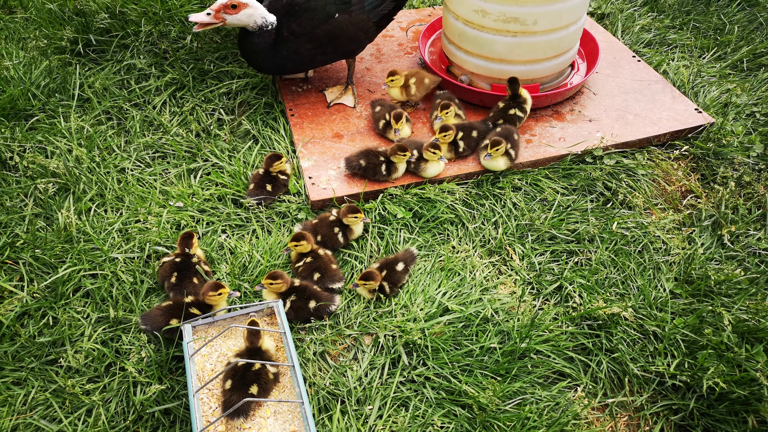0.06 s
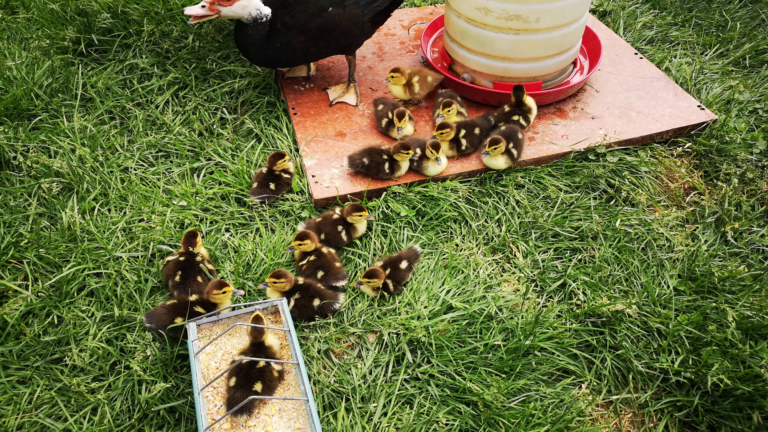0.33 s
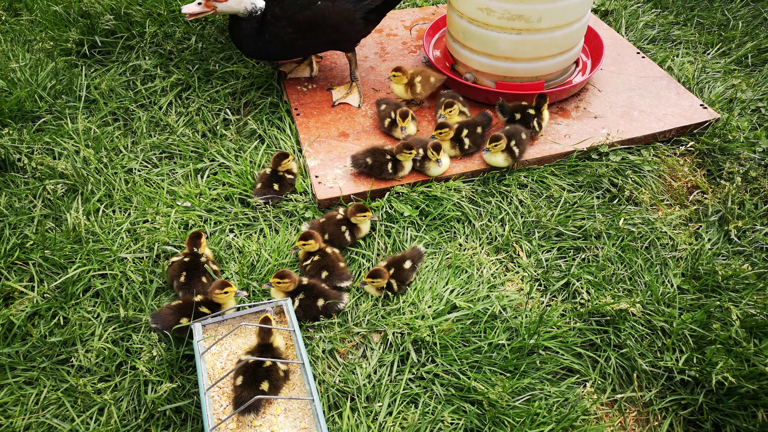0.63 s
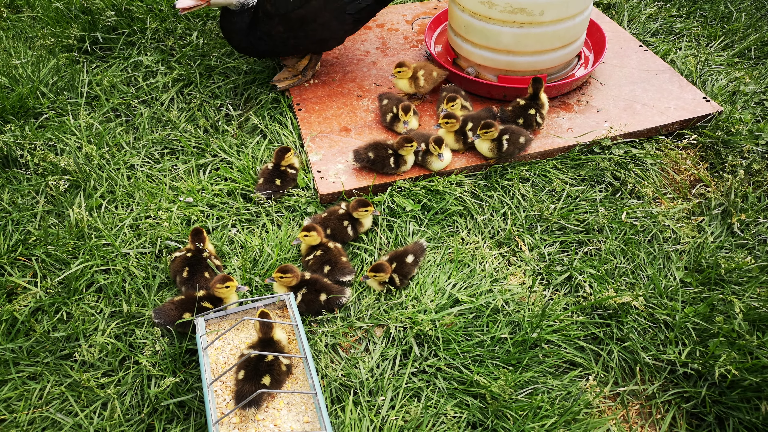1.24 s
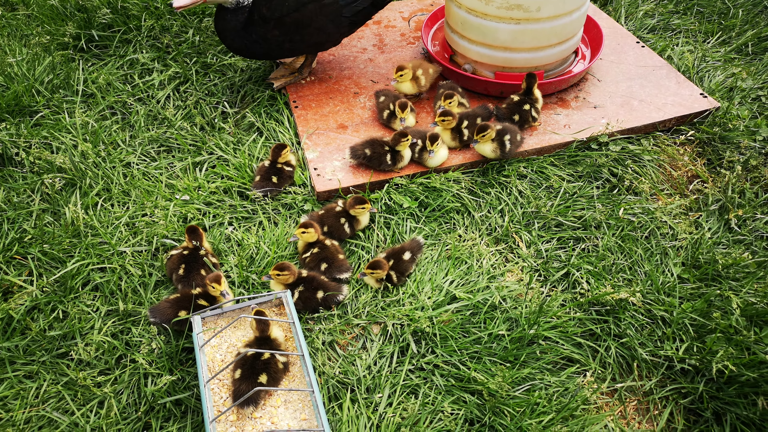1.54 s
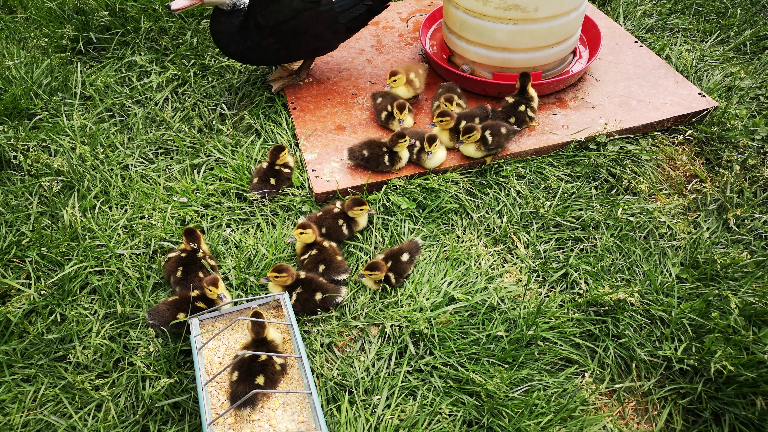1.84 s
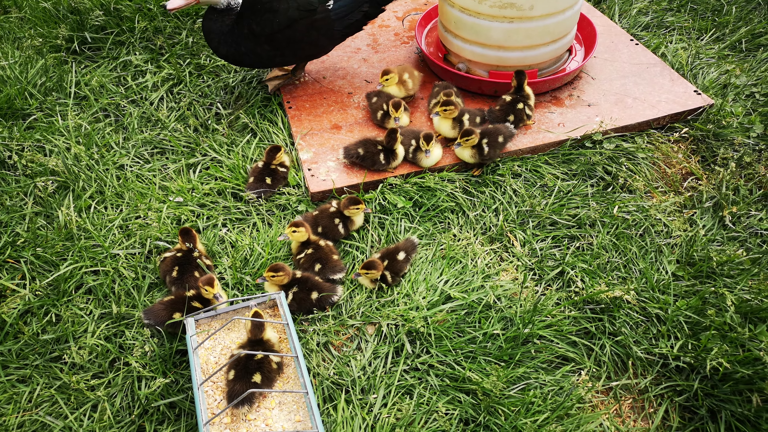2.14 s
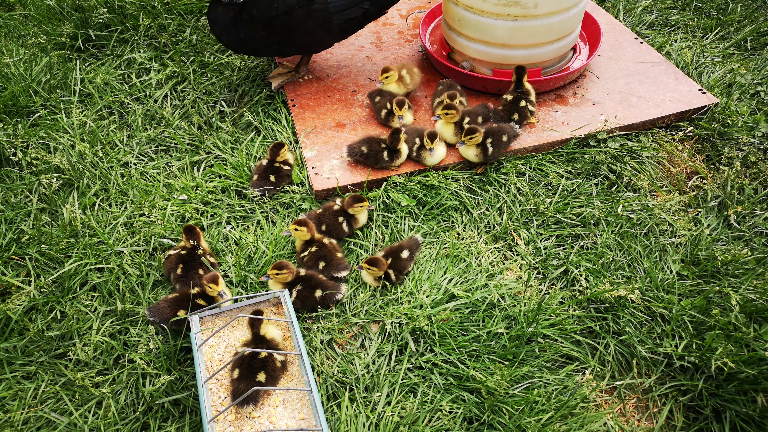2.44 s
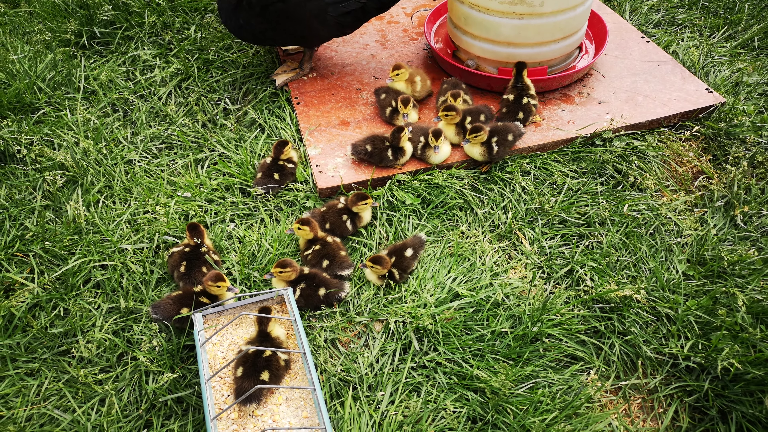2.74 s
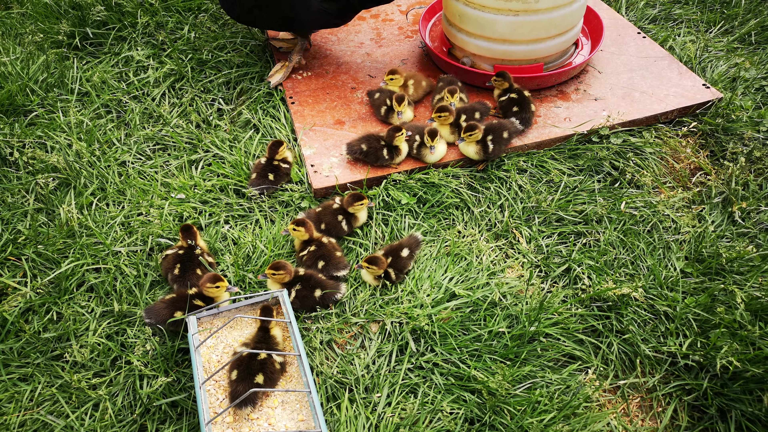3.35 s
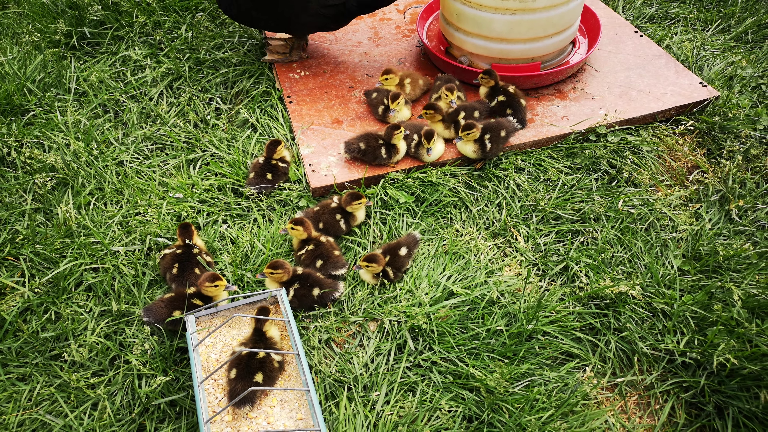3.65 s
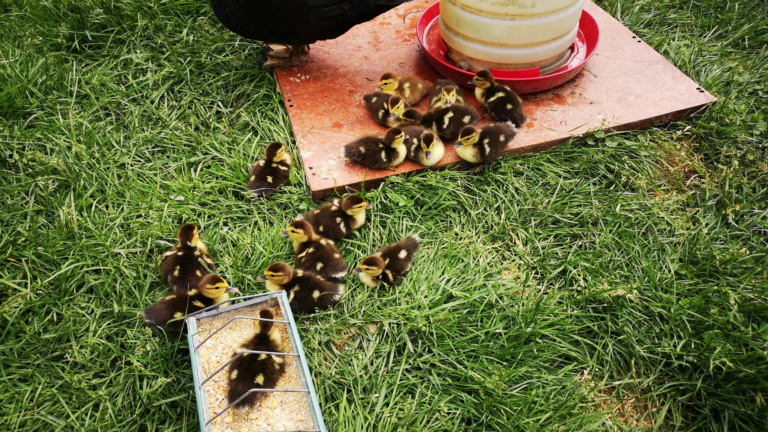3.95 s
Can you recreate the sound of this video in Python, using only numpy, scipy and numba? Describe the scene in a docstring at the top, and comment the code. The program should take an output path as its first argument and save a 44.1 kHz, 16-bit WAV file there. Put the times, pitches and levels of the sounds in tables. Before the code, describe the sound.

A hen's drawn-out whine and raspy cackle follow light beak taps, faint duckling peeps and a few soft clucks in a quiet yard. Small birds call far off, and the rumbling microphone is bumped near the end.

```python
"""Hen and ducklings in a yard

Ducklings peep, tap and knock at a hollow feeder and rustle the grass; a hen clucks softly.
Another hen, on the right, swells into a long whine that drops in pitch and breaks into a hoarse
cackle: syrinx pulses and rasp ringing her throat. Small birds call further off, over a soft hiss
and a distant drone. Air rumbles on the microphone, which takes one dull bump."""
import sys
import numpy as np
from scipy import signal
from scipy.fft import rfft, irfft, next_fast_len
from scipy.io import wavfile
from scipy.ndimage import uniform_filter1d, map_coordinates
from numba import njit

SR = 44100
rng = np.random.default_rng(int(sys.argv[2]) if len(sys.argv) > 2 else 0)


def master_out(mix):
    """Clip the mix to full scale and print it as 16-bit PCM to the path in sys.argv[1]."""
    frames = np.transpose(np.atleast_2d(mix))
    ceiling = np.clip(frames, -1, 1)
    pcm = np.round(ceiling * 32767).astype(np.int16)
    wavfile.write(sys.argv[1], SR, pcm)


N = 176400


def amp(db):
    """Decibels to gain."""
    return 10 ** (np.asarray(db) / 20)


def unit(x):
    """Scale to rms 1."""
    return x / np.sqrt(np.mean(x ** 2) + 1e-20)


def clock():
    """Time of every sample in seconds."""
    return np.arange(N) / SR


def along(points, hz):
    """Interpolate (Hz, value) points on a log frequency axis."""
    freqs, values = np.transpose(points)
    return np.interp(np.log(hz + 1), np.log(freqs + 1), values)


def curve(points):
    """Interpolate (seconds, value) points at every sample."""
    times, values = np.transpose(points)
    return np.interp(clock(), times, values)


def gate(start, end, fade_s=0.0034):
    """1 between two times, with soft edges."""
    return np.clip(np.minimum(clock() - start, end - clock()) / fade_s + .5, 0, 1)


def loudness(points):
    """Gain from (seconds, dB) points, silent outside their span."""
    return amp(curve(points)) * gate(points[0][0], points[-1][0])


def swells(rows):
    """Sum of bell-shaped rises and falls of gain."""
    return sum(amp(db) * np.exp(-((clock() - centre) / half) ** 2) for centre, half, db in rows)


def wobble(rate):
    """Smooth random curve, rate knots a second."""
    return map_coordinates(rng.standard_normal(8192), [clock() * rate], mode="wrap")


def tone(hz):
    """Sine of rms 1 following a pitch curve."""
    return np.sqrt(2) * np.sin(2 * np.pi * np.cumsum(hz) / SR)


def filtered(x, response):
    """Apply a frequency response, given as a function of Hz."""
    size = next_fast_len(N + SR // 4)
    return irfft(rfft(x, size) * response(np.fft.rfftfreq(size, 1 / SR)), size)[..., :N]


def pan(x, db):
    """Place a sound by its left-minus-right level."""
    ratio = amp(db)
    return np.array([2 * ratio / (1 + ratio) * x, 2 / (1 + ratio) * x])


def steady(x):
    """Even out the level, leaving the fast grain."""
    return x / np.sqrt(np.abs(uniform_filter1d(x * x, size=1100)) + 1e-14)


@njit
def three_poles(x, hz, width_hz):
    """Three complex one-pole stages in series, tuned per sample."""
    y = np.zeros(len(x))
    a, b, c = 0j, 0j, 0j
    radius = np.exp(-np.pi * width_hz / SR)
    for i in range(len(x)):
        angle = 2 * np.pi * hz[i] / SR
        pole = radius * complex(np.cos(angle), np.sin(angle))
        a = a * pole + (1 - radius) * x[i] + 1e-20
        b = b * pole + (1 - radius) * a
        c = c * pole + (1 - radius) * b
        y[i] = c.real
    return y


def resonate(x, hz, width_hz):
    """Steep resonance with a constant or moving centre."""
    return three_poles(x, hz * np.ones(len(x)), float(width_hz))


def yard_echo(x, t60_s=0.17):
    """Short scattered echoes from fences and sheds."""
    t = np.arange(SR // 2) / SR
    onset = 1 - np.exp(-t / 0.00083)
    tail = rng.standard_normal((2, len(t))) * amp(-60 * t / t60_s) * onset
    return signal.fftconvolve(x, tail / np.linalg.norm(tail[0]), axes=1)[:, :N]


# Hiss spectrum. Each row: frequency in Hz, relative level in dB.
HISS_SPECTRUM = [(150, -34), (250, 0.5), (405, -6.5), (534, -16), (1380, -1.5), (2360, 0), (3630, -9.5),
                 (5040, -17), (7640, -17.5), (15500, -33)]
# Hiss level. Each row: time in seconds, level in dB.
HISS_LEVEL = [(0, -64), (2.3, -63), (3.6, -58)]
# Hiss direction. Each row: frequency in Hz, left minus right in dB.
HISS_BALANCE = [(900, 1.5), (2380, -11), (6000, -1.5)]
# Hiss width. Each row: frequency in Hz, left-right correlation.
HISS_CORRELATION = [(2200, 0.12), (8000, 0.023)]


def yard_hiss():
    """Soft, wide hiss, mostly from the right."""
    def mid_side_gains(hz):
        angle = np.arccos(along(HISS_CORRELATION, hz)) / 2
        return amp(along(HISS_SPECTRUM, hz)) * [np.cos(angle), np.sin(angle)]

    mid, side = filtered(rng.standard_normal((2, N)), mid_side_gains)
    stereo = np.array([mid + side, mid - side])
    hiss = unit(filtered(stereo, lambda hz: pan(1, along(HISS_BALANCE, hz))))
    return hiss * amp(curve(HISS_LEVEL) + 0.38 * wobble(7.35))


# Drone partials. Each row: frequency in Hz, level in dB.
DRONE_PARTIALS = [(86, -61), (172, -65)]


def drone():
    """Distant drone, wavering in level and pitch."""
    return sum(amp(db + 2.52 * wobble(5.8)) * tone(hz * (1 + 0.01503 * wobble(12)))
               for hz, db in DRONE_PARTIALS)


# Rumble spectrum. Each row: frequency in Hz, relative level in dB.
RUMBLE_SPECTRUM = [(25, -1.5), (50, 4.5), (85, -3.5), (120, -6.5), (175, -10), (240, -17), (350, -40.5),
                   (1500, -110)]
# Rumble level. Each row: time in seconds, level in dB.
RUMBLE_LEVEL = [(0, -53), (2.6, -56), (3.55, -45.5), (4, -49)]
# Puffs of air. Each row: centre in seconds, half length in seconds, level in dB.
GUSTS = [(.04, 0.0079, -38.5), (.35, 0.051, -52.5), (.64, 0.075, -51), (1.5, 0.012, -42.5),
         (3.07, 0.077, -51), (3.85, 0.082, -35)]
GUST_CUTOFF_HZ = 91


def microphone_rumble():
    """Air buffets the microphone, with deeper puffs; the same on both sides."""
    rumble = unit(filtered(rng.standard_normal(N), lambda hz: amp(along(RUMBLE_SPECTRUM, hz))))
    deep = unit(filtered(rumble, lambda hz: 1 / np.hypot(1, hz / GUST_CUTOFF_HZ)))
    return rumble * amp(curve(RUMBLE_LEVEL)) + deep * swells(GUSTS)


def microphone_bump(centre_s=3.8795, hz=97.1, peak_db=-14.5):
    """One dull bump on the microphone: a single low pulse."""
    phase_squared = (np.pi * hz * (clock() - centre_s)) ** 2
    return amp(peak_db) * (1 - 2 * phase_squared) * np.exp(-phase_squared)


# Whistle envelope. Each row: time in seconds, level in dB.
WHISTLE_LEVEL = [(0.9, -67), (0.946, -53), (1.09, -58), (1.12, -69), (1.135, -58), (1.22, -59),
                 (1.258, -71), (1.296, -64), (1.36, -68)]
WHISTLE_HZ, WHISTLE_SAG_HZ_PER_S, WHISTLE_PAN_DB = 2845, 120, 9


def bird_whistle():
    """One long, faltering whistle that sinks slightly."""
    sinking_hz = WHISTLE_HZ - WHISTLE_SAG_HZ_PER_S * (clock() - WHISTLE_LEVEL[0][0])
    pitch = sinking_hz * (1 + 0.0028 * wobble(38.1))
    return pan(loudness(WHISTLE_LEVEL) * tone(pitch), WHISTLE_PAN_DB)


# Trill envelope. Each row: time in seconds, level in dB.
TRILL_LEVEL = [(1.52, -81), (1.588, -65.5), (2.15, -86)]
TRILL_HZ, TRILL_SPREAD_HZ = 4270, 144


def bird_trill():
    """A far bird's call, buzzy from fast pitch jitter."""
    return loudness(TRILL_LEVEL) * tone(TRILL_HZ + TRILL_SPREAD_HZ * wobble(700))


# Peeps and chirps. Each row: start in seconds, length in seconds, pitch in Hz, level in dB.
PEEPS = [(0.16, 0.031, 3600, -69), (0.468, 0.035, 3513, -65.5), (0.735, 0.027, 3730, -64.5),
         (0.803, 0.028, 3620, -73), (1.312, 0.015, 3065, -69.5), (1.374, 0.025, 2690, -67),
         (1.455, 0.016, 7310, -73.5), (1.562, 0.075, 7050, -73.5)]
PEEP_ATTACK_S, PEEP_T60_S = 0.0083, 0.25
PEEP_BUZZ_HZ, PEEP_BUZZ_GAIN, PEEP_WARBLE_DEPTH = 319, 0.57, 0.0089


def peeps():
    """Duckling peeps and far chirps: warbling tones with buzzy sidebands and ringing tails."""
    out = np.zeros(N)
    for start, length, hz, db in PEEPS:
        t = np.maximum(clock() - start, 0)
        attack = np.minimum(t / PEEP_ATTACK_S, 1)
        decay = amp(-60 * np.maximum(t - length, 0) / PEEP_T60_S)
        pitch = hz * (1 + PEEP_WARBLE_DEPTH * wobble(350))
        sidebands = tone(pitch + PEEP_BUZZ_HZ) + .5 * tone(pitch - PEEP_BUZZ_HZ)
        out += amp(db) * attack * decay * (tone(pitch) + PEEP_BUZZ_GAIN * sidebands)
    return out


# Grass rustles. Each row: centre in seconds, half length in seconds, level in dB.
RUSTLES = [(.85, 0.022, -71.5), (1.12, 0.11, -74.5), (1.87, 0.069, -76.5)]
RUSTLE_GRAIN_DB, DUCKLING_PAN_DB = 5.5, -7


def rustles():
    """Grass blades crackle under small feet."""
    grains = rng.standard_normal(N) * amp(RUSTLE_GRAIN_DB * wobble(770))
    crackle = unit(resonate(grains, hz=7800, width_hz=6800))
    return pan(swells(RUSTLES) * crackle, DUCKLING_PAN_DB)


# Blows on the feeder. Each row: start in seconds, level in dB.
KNOCKS = [(0.235, -66.5), (.727, -47), (.744, -47), (0.843, -51.5), (0.859, -50.5), (0.942, -55.5),
          (1.194, -64), (1.339, -64)]
# Feeder modes. Each row: frequency in Hz, relative peak in dB, T60 in seconds.
FEEDER_MODES = [(229.5, -1, 0.16), (315, 1.5, 0.057), (445, -4.5, 0.028), (544, 3, 0.021), (922, -3, 0.099)]
SCUFF_T60_S, KNOCK_PAN_DB = 0.092, 3.5


def feeder_knocks():
    """Short scuffing blows ring the hollow feeder."""
    out = np.zeros(N + SR)
    t = np.arange(SR // 4) / SR
    for start, db in KNOCKS:
        scuff = rng.standard_normal(len(t)) * amp(-60 * t / SCUFF_T60_S)
        for hz, mode_db, t60 in FEEDER_MODES:
            mode = np.sin(2 * np.pi * hz * t) * amp(-60 * t / t60)
            ring = signal.fftconvolve(scuff, mode)[:len(t)]
            out[int(start * SR):][:len(t)] += amp(db + mode_db) * ring / np.abs(ring).max()
    return pan(out[:N], KNOCK_PAN_DB)


# Beak taps. Each row: start in seconds, level in dB, ring frequency in Hz.
TAPS = [(0.078, -58.5, 4500), (0.197, -51, 3470), (0.2393, -44.5, 1290), (0.2521, -56, 3770),
        (0.266, -54, 2920), (0.65, -66, 6150), (0.6855, -54, 2610), (0.7448, -48, 1880)]
# Click spectrum. Each row: frequency in Hz, relative level in dB.
CLICK_SPECTRUM = [(500, -5), (2500, 6), (8500, -6), (16000, -28)]
TAP_T60_S = .025


def beak_taps():
    """Beaks hit the feeder: a dry click and the short ring of the struck spot."""
    clicks, rings = np.zeros((2, N + SR))
    t = np.arange(SR // 10) / SR
    for start, db, hz in TAPS:
        click = amp(db - 60 * t / TAP_T60_S) * rng.standard_normal(len(t))
        ring = resonate(click, hz, width_hz=0.22 * hz)
        clicks[int(start * SR):][:len(t)] += click
        rings[int(start * SR):][:len(t)] += click.std() * unit(ring)
    coloured = filtered(clicks[:N], lambda hz: unit(amp(along(CLICK_SPECTRUM, hz))))
    return pan(coloured + rings[:N], DUCKLING_PAN_DB)


# Soft clucks. Each row: start in seconds, length in seconds, level in dB.
CLUCKS = [(1.026, 0.028, -50.5), (1.623, 0.051, -59.5), (1.953, 0.04, -68.5), (2.277, 0.056, -54.5)]
# Throat resonances. Each row: centre in Hz, width in Hz, relative gain in dB.
CLUCK_FORMANTS = [(510, 210, -11.5), (950, 275, -1.5), (1160, 310, -4), (2150, 200, -19)]
CLUCK_PULSE_HZ, CLUCK_PAN_DB = 75, 4.5


def clucks():
    """A second hen: a few slow, uneven pulses through a nearly closed beak."""
    cycles = np.cumsum(CLUCK_PULSE_HZ * np.exp(0.15 * wobble(60))) / SR
    puffs = rng.standard_normal(N) * np.exp(-(cycles % 1) / 0.26)
    voice = steady(sum(amp(db) * resonate(puffs, hz, width) for hz, width, db in CLUCK_FORMANTS))
    envelope = sum(amp(db) * gate(start, start + length) for start, length, db in CLUCKS)
    return pan(voice * envelope, CLUCK_PAN_DB)


# Wheezes. Each row: start in seconds, length in seconds, level in dB.
WHEEZES = [(3.759, 0.1, -59.5), (3.915, .085, -60)]
WHEEZE_HZ, WHEEZE_FALL_HZ_PER_S = 2890, 8500
HEN_FADE_S, HEN_PAN_DB = 0.023, -9.5


def wheezes():
    """The hen's unvoiced rasp slides down after each of her last two syllables."""
    out = np.zeros(N)
    for start, length, db in WHEEZES:
        centre_hz = WHEEZE_HZ - WHEEZE_FALL_HZ_PER_S * np.clip(clock() - start, 0, .1)
        breath = unit(resonate(rng.standard_normal(N), centre_hz, width_hz=560))
        out += amp(db) * gate(start, start + length, HEN_FADE_S) * breath
    return pan(out, HEN_PAN_DB)


BREAK_START_S, BREAK_END_S = 3.22, 3.404


def voice_break(whine, cackle):
    """Glide a setting from its whine value to its cackle value."""
    progress = np.clip((clock() - BREAK_START_S) / (BREAK_END_S - BREAK_START_S), 0, 1)
    return whine + (cackle - whine) * progress


# The hen's pitch. Each row: time in seconds, pitch in Hz.
HEN_PITCH = [(2.5, 312), (2.71, 339.1), (2.77, 336.8), (3.155, 352.5), (3.185, 320.7), (3.23, 322),
             (3.26, 300.4), (3.335, 295.8), (3.36, 309.2), (3.38, 264), (3.415, 263.2), (3.435, 293.3),
             (3.465, 273.5), (3.49, 300.5), (3.515, 266.9), (3.55, 282.7), (3.585, 269.3), (3.635, 305.5),
             (3.665, 259.1), (3.71, 269.9), (3.835, 318.4), (3.865, 265.3), (3.91, 282.2)]
FLUTTER_DEPTH, PULSE_SCATTER_DB = 0.0112, 0.5


def syrinx():
    """Jittery pulses plus rasp gated by each cycle. Returns the sound and its phase in cycles."""
    pitch = curve(HEN_PITCH) * (1 + FLUTTER_DEPTH * wobble(45))
    jitter = voice_break(0.016, 0.011) * wobble(300)
    cycles = np.cumsum(pitch) / SR + jitter
    from_pulse = (cycles + .5) % 1 - .5
    pulses = np.sinc(from_pulse * SR / pitch / 2) * np.cos(np.pi * from_pulse) ** 2
    pulses = unit(pulses * amp(PULSE_SCATTER_DB * wobble(270)))
    rasp = unit(rng.standard_normal(N) * np.exp(-(cycles % 1) / 0.59))
    rasp_mix = voice_break(0.24, .15)
    return np.sqrt((1 - rasp_mix) / 2) * pulses + np.sqrt(rasp_mix) * rasp, cycles


# Throat resonances. Each row: whine centre in Hz, whine gain in dB, cackle centre in Hz,
# cackle gain in dB, width in Hz. Gains are relative.
HEN_FORMANTS = [(1853, -1.5, 1850, -2, 1420), (3125, 5.5, 2960, 7.5, 380), (3490, 10, 3100, 14, 166),
                (4545, -8, 4310, -19, 510), (5380, -15, 5150, -32, 420), (7220, -10.5, 7630, -13.5, 650),
                (9190, -17.5, 8950, -24, 570)]
THROAT_WANDER_DEPTH, SIZZLE_DB, SIZZLE_PULSE_DB = .009, -23, 4


def throat(source):
    """Wavering resonances colour the voice; a broad, pulsing sizzle tops the cackle."""
    stretch = 1 + THROAT_WANDER_DEPTH * wobble(22)
    voice = np.zeros(N)
    for whine_hz, whine_db, cackle_hz, cackle_db, width in HEN_FORMANTS:
        centre_hz = stretch * voice_break(whine_hz, cackle_hz)
        voice += amp(voice_break(whine_db, cackle_db)) * resonate(source, centre_hz, width)
    sizzle = unit(resonate(source, hz=7900, width_hz=5200))
    sizzle_gain = voice_break(0, 1) * amp(SIZZLE_DB + SIZZLE_PULSE_DB * wobble(70))
    return steady(voice) + sizzle_gain * sizzle


def rough_harmonic(cycles, order):
    """One harmonic with random level and phase, rougher in the cackle."""
    scatter = voice_break(.33, .5) * (wobble(140) + 1j * wobble(140))
    return unit(np.real((1 + scatter) * np.exp(2j * np.pi * order * cycles)))


# The hen's syllables. Each row: start in seconds, length in seconds, effort at the start in dB,
# effort at the end in dB, fourth harmonic level in dB.
SYLLABLES = [(2.483, 0.26, -80, -61.5, -72), (2.774, 0.38, -61.5, -55, -72.5),
             (3.168, 0.08, -51.5, -52, -55.5), (3.242, 0.086, -55, -50.5, -52.5),
             (3.341, 0.022, -52, -56, -51), (3.37, 0.099, -47, -50.5, -53.5),
             (3.457, 0.036, -66, -43.5, -52.5), (3.502, 0.08, -46.5, -45, -48),
             (3.648, 0.061, -49, -52.5, -55.5), (3.848, 0.057, -47.5, -55.5, -55)]
BRIGHT_GAIN_DB, SHUDDER_DB = 3, 1
SECOND_GAIN_DB, SECOND_EXPONENT, SECOND_PAN_DB = -36, 0.44, 3.5
FOURTH_LAG_S, FOURTH_PAN_DB = 0.012, -3


def hen():
    """Whine breaking into a cackle: the syrinx rings the throat, over two rough low harmonics."""
    source, cycles = syrinx()
    bright = throat(source)
    effort, fourth_gain = np.zeros((2, N))
    for start, length, start_db, end_db, fourth_db in SYLLABLES:
        end = start + length
        effort += amp(curve([(start, start_db), (end, end_db)])) * gate(start, end, HEN_FADE_S)
        fourth_gain += amp(fourth_db) * gate(start + FOURTH_LAG_S, end + FOURTH_LAG_S, HEN_FADE_S)
    effort *= amp(SHUDDER_DB * wobble(70))
    voice = amp(BRIGHT_GAIN_DB) * effort * bright
    fourth = fourth_gain * rough_harmonic(cycles, order=4)
    # The second harmonic swells less than the bright voice.
    second = amp(SECOND_GAIN_DB) * effort ** SECOND_EXPONENT * rough_harmonic(cycles, order=2)
    return pan(voice, HEN_PAN_DB) + pan(fourth, FOURTH_PAN_DB) + pan(second, SECOND_PAN_DB)


NEAR_ECHO_DB, CALLS_ECHO_DB, CALLS_PAN_DB = -5, 0.5, -7.5


def scene():
    """Animals and feeder with the yard's echo, over hiss, drone and microphone noise."""
    near = hen() + wheezes() + clucks() + beak_taps() + feeder_knocks() + rustles()
    near += amp(NEAR_ECHO_DB) * yard_echo(near)
    calls = pan(peeps() + bird_trill(), CALLS_PAN_DB)
    birds = calls + bird_whistle() + amp(CALLS_ECHO_DB) * yard_echo(calls)
    return near + birds + yard_hiss() + drone() + microphone_rumble() + microphone_bump()


# Phase between the microphone ports. Each row: frequency in Hz, left minus right in radians.
PORT_PHASE = [(30, 0.14), (170, 0.33), (520, 2.47), (1210, 1.96), (2240, 3.37), (2840, 7.65), (8960, 25.9),
              (15200, 28)]
BAND_LIMIT_HZ = 15700


def record(dry):
    """The two microphone ports differ in phase; nothing passes above the band limit."""
    def response(hz):
        phase = np.outer([.5, -.5], along(PORT_PHASE, hz))
        return np.exp(1j * phase) * (hz < BAND_LIMIT_HZ)

    return filtered(dry, response)


dry = scene()
out = record(dry)
master_out(out)
```